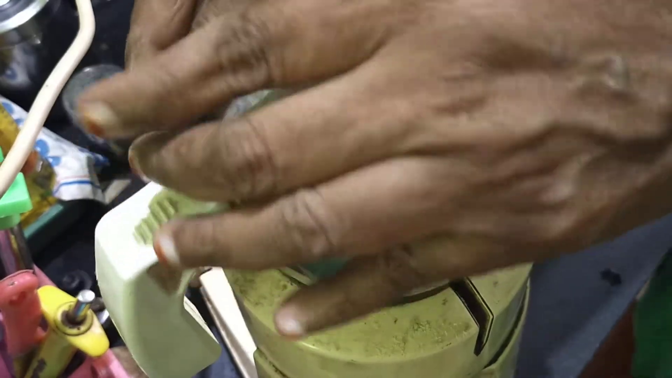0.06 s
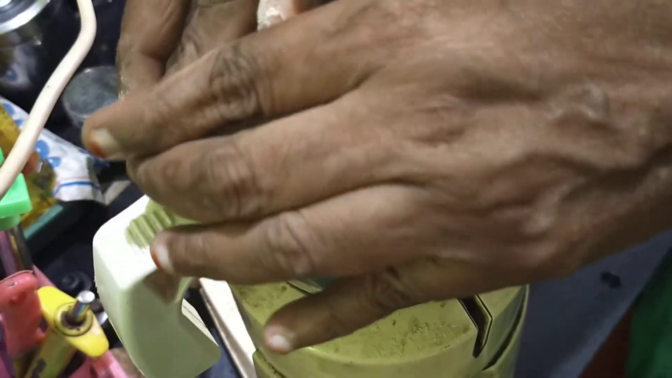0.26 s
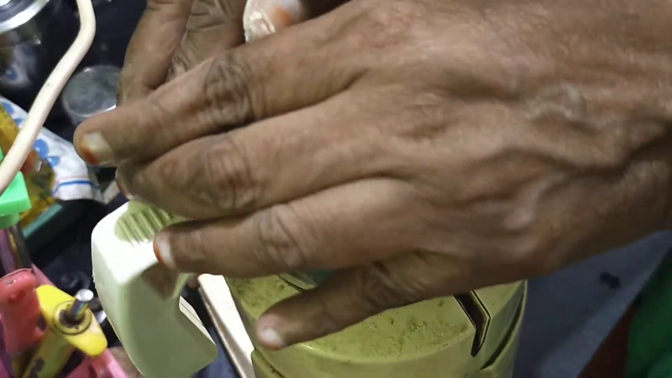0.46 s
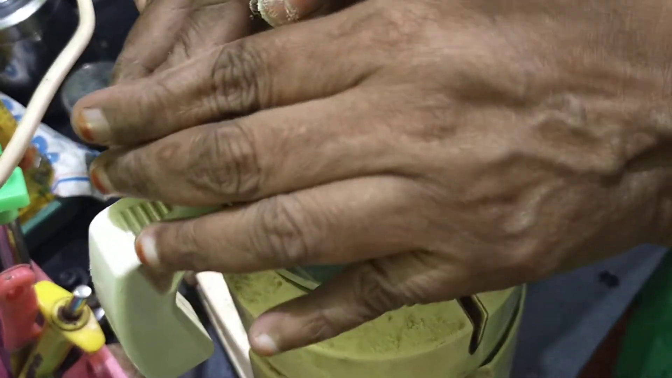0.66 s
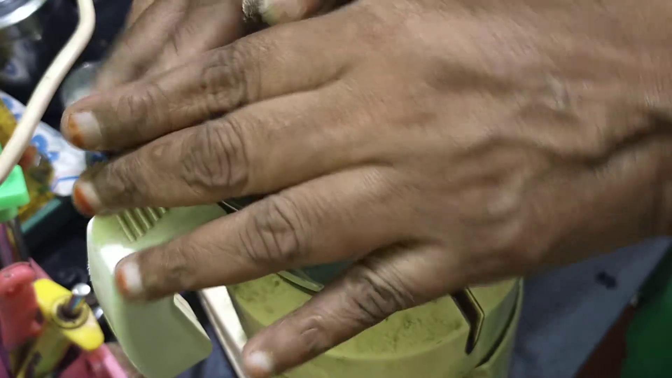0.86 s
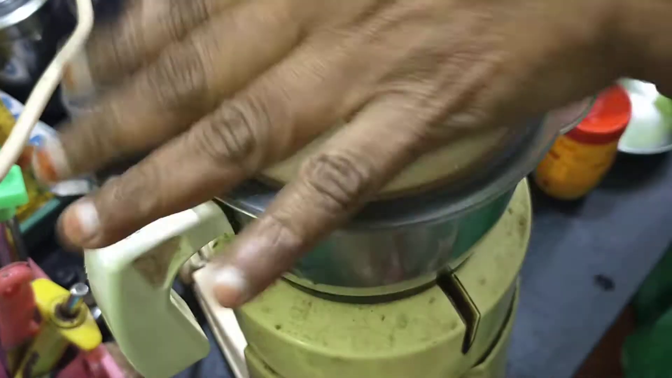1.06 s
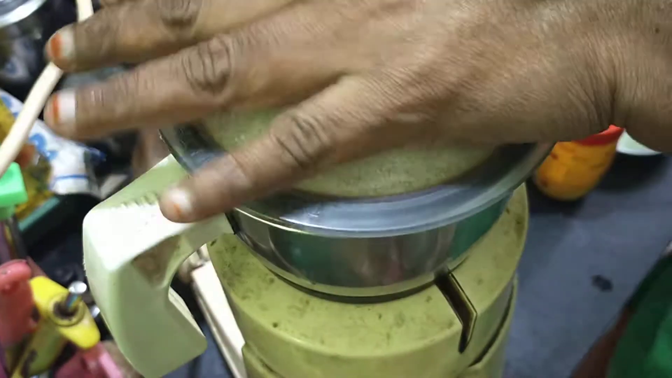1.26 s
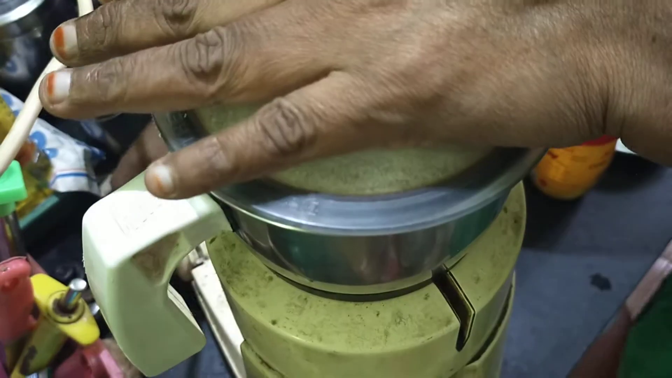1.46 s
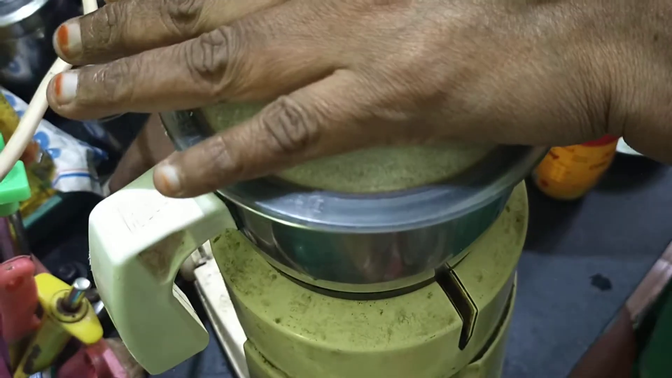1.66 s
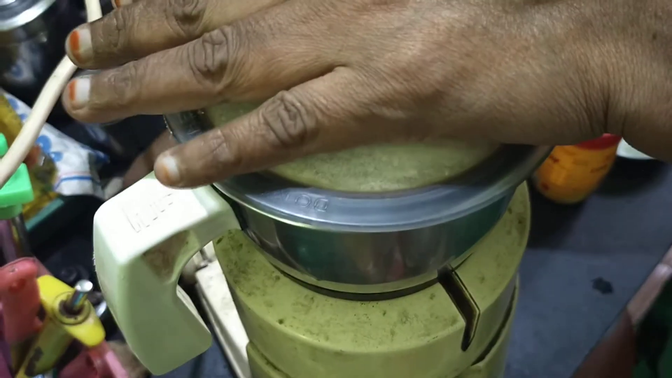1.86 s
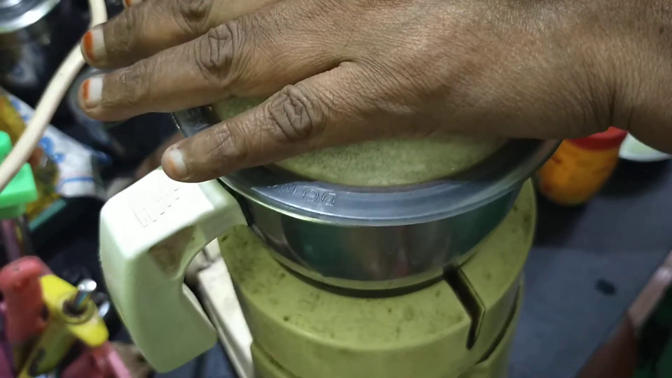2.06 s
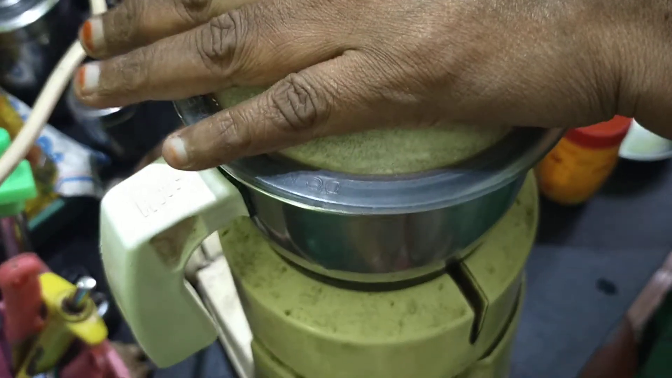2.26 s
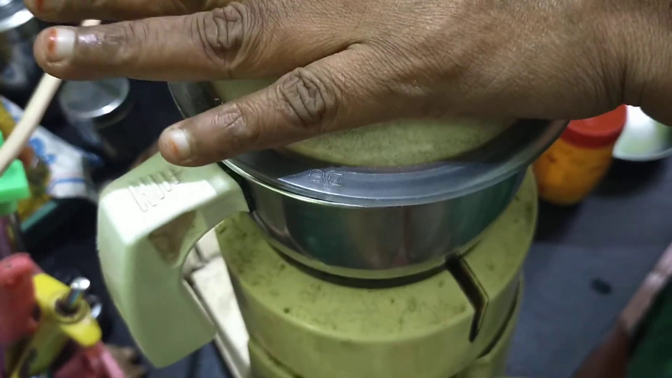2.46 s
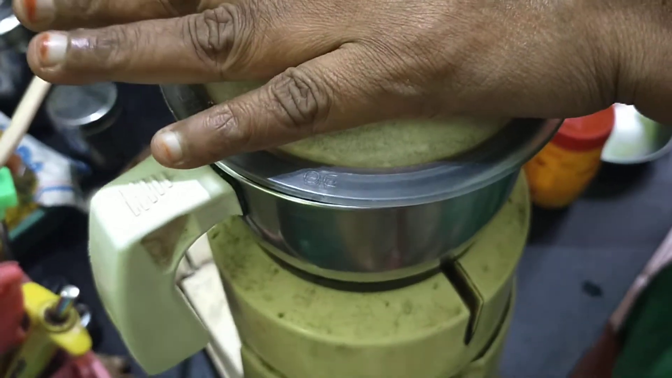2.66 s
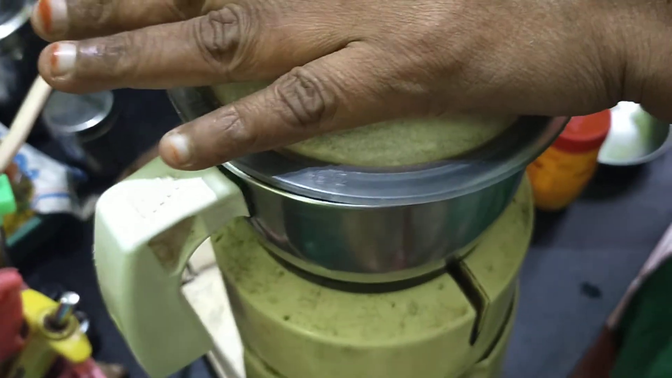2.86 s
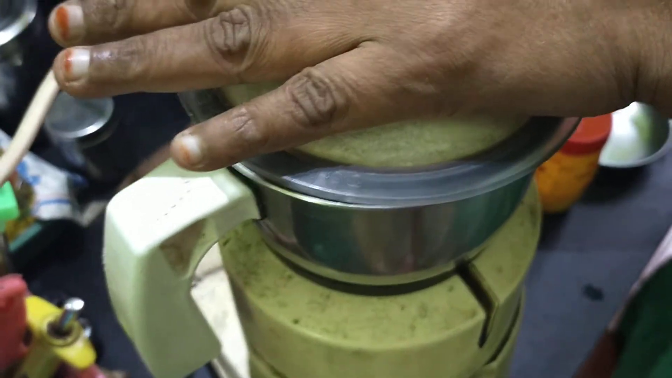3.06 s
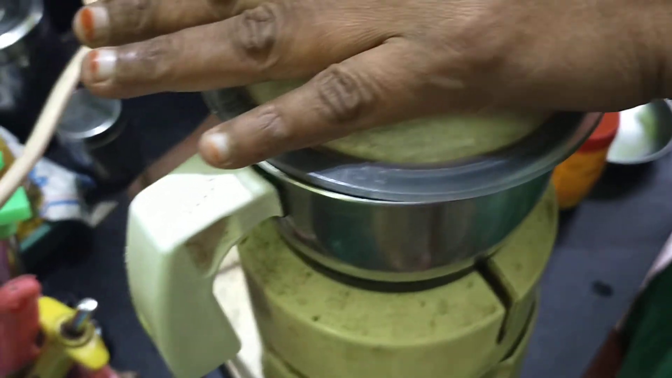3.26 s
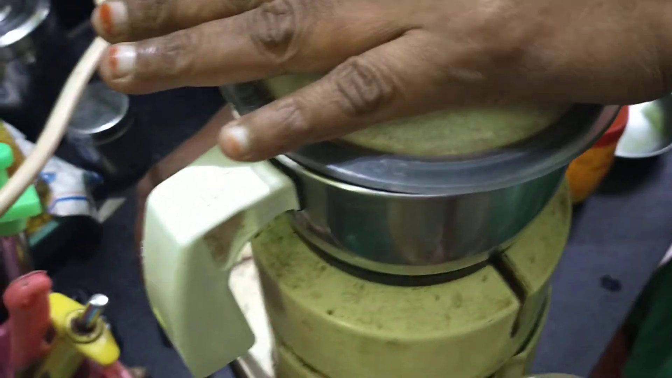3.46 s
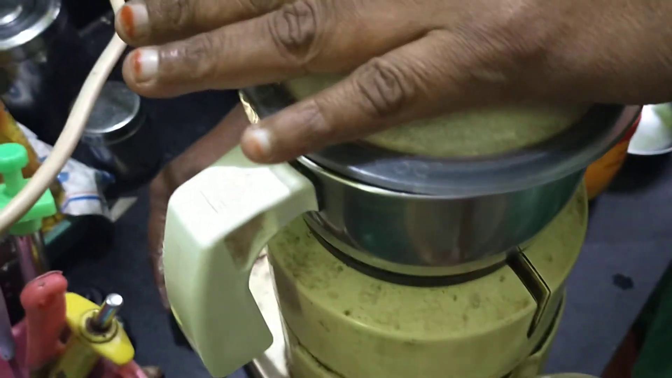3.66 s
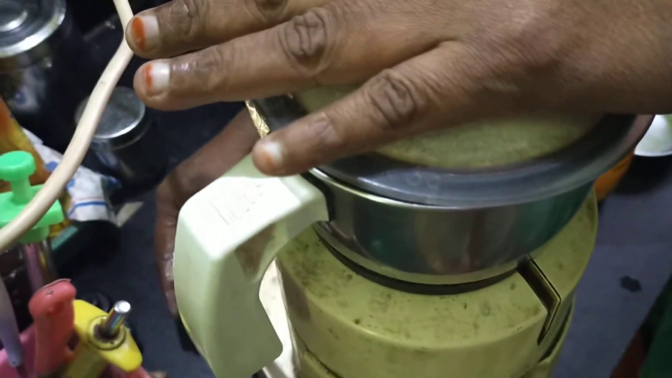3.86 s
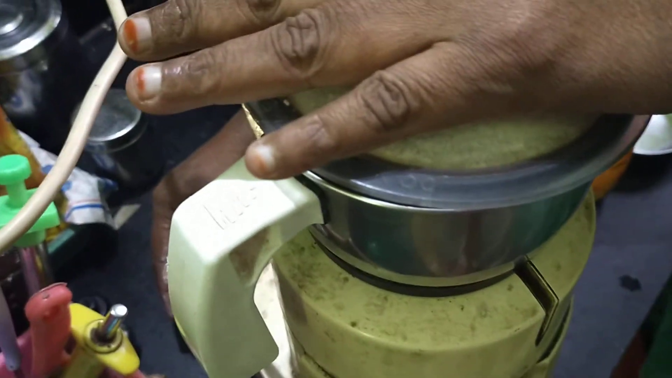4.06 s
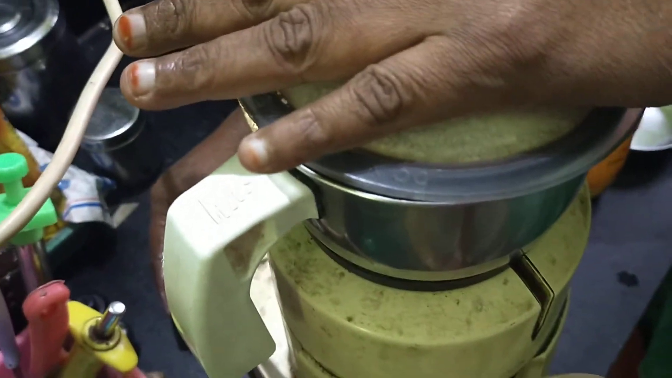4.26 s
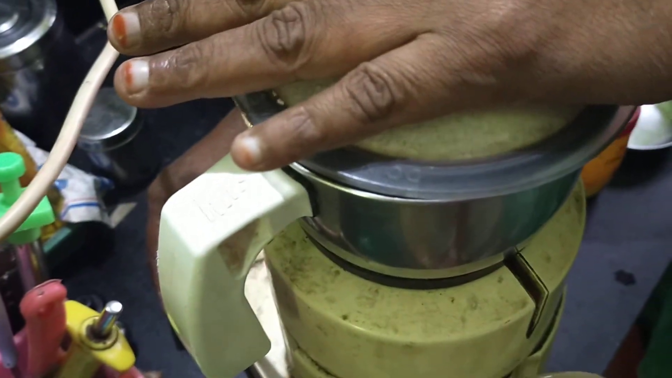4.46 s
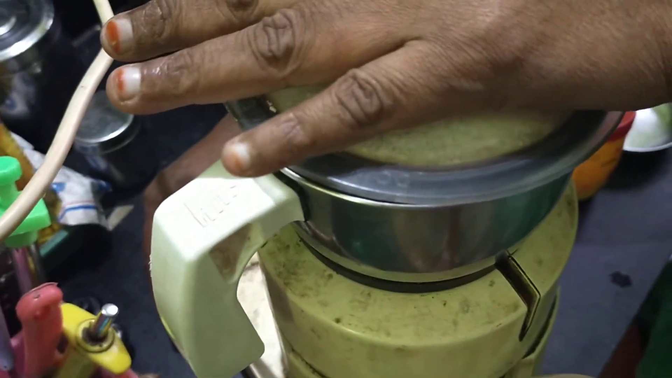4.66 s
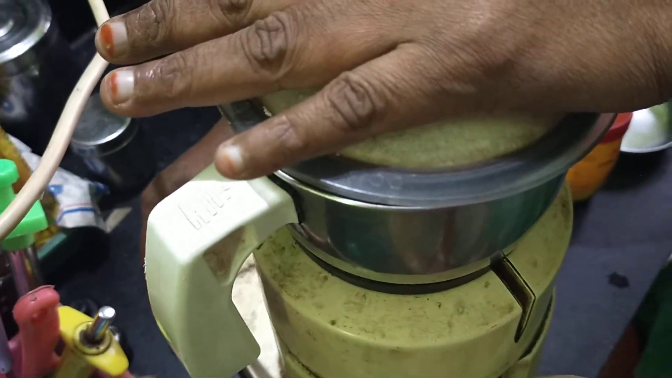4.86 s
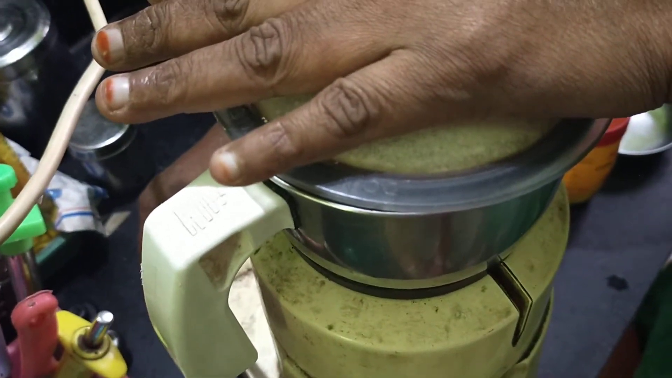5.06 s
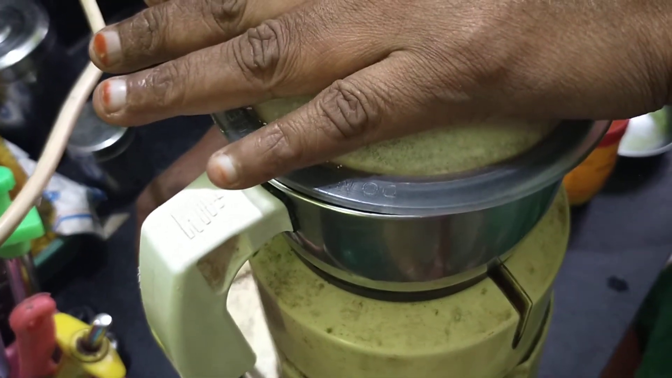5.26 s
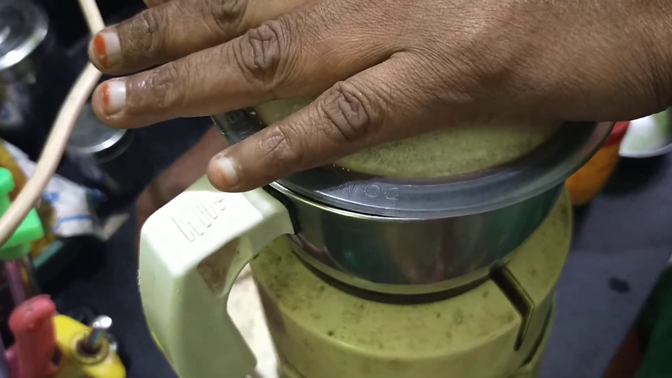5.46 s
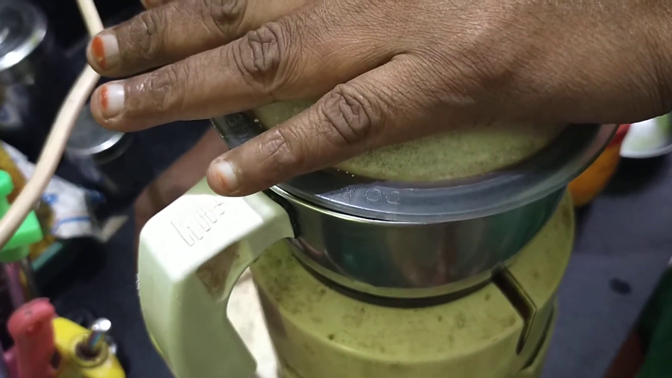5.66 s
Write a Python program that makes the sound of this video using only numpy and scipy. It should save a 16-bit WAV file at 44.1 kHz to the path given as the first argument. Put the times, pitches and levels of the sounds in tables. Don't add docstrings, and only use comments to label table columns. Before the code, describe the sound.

Light rubs and plastic clicks as a lid is pressed on, then a switch snaps and a grinder roars steadily with a high whine.

```python
import sys
import numpy as np
from scipy import signal
from scipy.io import wavfile
from scipy.ndimage import uniform_filter1d

SR = 44100
rng = np.random.default_rng(int(sys.argv[2]) if len(sys.argv) > 2 else 0)


def wav_record(signal):
    frames = np.transpose(np.atleast_2d(signal))
    bounded = np.clip(frames, -1, 1)
    quanta = np.round(bounded * 32767).astype(np.int16)
    wavfile.write(sys.argv[1], SR, quanta)


def voltage_ratio(decibels):
    exponent = np.asarray(decibels, float) / 20
    return 10 ** exponent


N = 252252
t = np.arange(N) / SR

# frequency_hz, level_db
ROOM_SPECTRUM = [(15, -39), (25, -7), (113, 3.5), (235, -5), (292, 1.5), (393, -7.5), (450, -3.5),
                 (693, -8), (1100, -7.5), (2040, -7), (2900, -6.5), (4980, -30), (8090, -19.5),
                 (9520, -26.5), (15900, -24.5)]
# peak_s, rise_s, fall_s, hiss_db, scrape_db
RUBS = [(.03, .09, .05, -64, -60), (.1, .04, .04, -55, -58), (.265, .13, .02, -66, -56),
        (.42, .17, .04, -62, -55), (.482, .022, .04, -44, -34), (.53, .025, .035, -47, -38),
        (.575, .045, .09, -59, -47), (.66, .06, .05, -57, -53), (.742, .056, .068, -50, -30),
        (.81, .05, .05, -61, -51), (1.0, .16, .085, -50, -50), (.885, .03, .04, -58, -53),
        (1.17, .07, .055, -52, -58), (1.3, .055, .14, -55, -65), (1.496, .045, .06, -58, -57),
        (1.623, .01, .035, -52, -45)]
# frequency_hz, level_db
HISS_SPECTRUM = [(2650, -52), (4500, -10), (5650, -12), (5950, -7), (7960, 3), (9580, -6), (10800, -4),
                 (14200, -3), (15900, -4.5)]
# frequency_hz, level_db
SCRAPE_SPECTRUM = [(300, -62), (900, -36), (1500, -29), (2100, -12.5), (2600, -4), (2950, -1), (3400, -7.5),
                   (4200, -18), (5000, -36), (7000, -59)]
# start_s, level_db, pitch_hz, treble_db, body_db
CLICKS = [(0.0772, -46, 2210, -55, -58), (0.1246, -36, 2860, -61, -55), (0.2623, -45, 3560, -52, -56),
          (0.3233, -42, 3070, -56, -49), (0.389, -38, 2870, -57, -52), (0.4356, -44, 2890, -52, -50),
          (0.4786, -24, 2150, -44, -43), (0.4834, -25, 2910, -40, -42), (0.5164, -29, 2980, -44, -48),
          (0.5236, -12, 2500, -41, -48), (0.5304, -30, 2580, -46, -45), (0.5373, -6.5, 2740, -31, -32),
          (0.8114, -36, 2890, -51, -58), (0.8724, -41, 2770, -48, -55), (0.8837, -31, 2820, -48, -51),
          (0.9226, -25, 2930, -35, -50), (0.9966, -39, 2800, -51, -52), (1.16, -51, 2780, -52, -51),
          (1.2166, -42, 2760, -62, -47), (1.6208, -42, 2990, -56, -41)]
# frequency_hz, level_db
LID_SPECTRUM = [(60, -40), (250, -4), (600, -5), (1500, -1), (2200, -2), (3500, -36)]
# start_s, level_db, pitch_hz, t60_s
THUDS = [(0.069, -51, 301, 0.06), (0.125, -35, 270, 0.054), (0.323, -25, 270, 0.05),
         (0.364, -42, 318, 0.06), (0.401, -31.5, 308, 0.06), (0.424, -37, 340, 0.07),
         (0.476, -28, 121, 0.087), (0.509, -32, 86.1, 0.06), (0.923, -37.5, 317, 0.066),
         (1.156, -37, 291, 0.094), (1.485, -46, 597, 0.068), (1.62, -41, 627, 0.06)]
# frequency_hz, level_db
SWITCH_SPECTRUM = [(900, -22), (2000, -11), (3000, -15), (5500, -30), (6800, -6), (8000, 0), (12000, -10),
                   (15000, -5)]
# start_s, level_db, pitch_hz, t60_s
LURCHES = [
    (1.738, -18.5, 385, .12),
    (1.742, -21, 453, 0.11),
    (1.84, -38, 88, .2),
]
# level_db, level_one_throb_below_db, level_one_throb_above_db
SHAFT_TONES = [(-33.5, -70, -48), (-31, -53, -76), (-44, -70, -62), (-44.5, -46.5, -45), (-39, -45, -51),
               (-43, -51, -40), (-45, -42, -56), (-37, -47, -44.5), (-47, -38.5, -39), (-43, -43, -40.5),
               (-49, -39, -44), (-29.5, -36, -30.5), (-34.5, -38, -29), (-34, -34.5, -35.5),
               (-47, -53, -30), (-35.5, -38, -38), (-44, -45, -47.5), (-42, -38, -72)]
HUM_LEVELS = [-24.5, -5, 3.5, -7, -13.5, -15.5, -13]
# frequency_hz, gain_db
BASE_RESONANCE = [(95, -15), (150, -12), (168, -22), (183, -1), (191, -8), (195.5, 3), (200, -5), (204, 0)]
# frequency_hz, gain_db
SECOND_MULTIPLE_GAIN = [(200, -28), (300, -16), (362, -2), (383, -9), (391, -2), (401, -14), (406, -3),
                        (414, -.5)]
# frequency_hz, gain_db
HOUSING_RESONANCE = [(1600, -16), (1850, -1), (2080, 6), (2250, -5), (2360, 3), (2430, -1.5), (2503, .6),
                     (2520, -5)]
# time_s, roar_db
LOAD = [(1.742, -23), (1.778, -25), (1.848, -15), (1.935, -23.5), (2.05, -20), (2.268, -22), (2.324, -19.5),
        (2.8, -19), (3.23, -20.5), (3.37, -19), (4.38, -19.5), (4.6, -17.5), (4.79, -20), (4.87, -17.5),
        (5.09, -20), (5.2, -18.5), (5.51, -22), (5.72, -18.5)]
# frequency_hz, level_db
ROAR_SPECTRUM = [(260, -36), (450, -27), (620, -24.5), (1000, -20.5), (1400, -17), (1900, -18), (2300, -10),
                 (2600, -8.5), (2850, -0.5), (3200, -6.5), (3750, -10.5), (4300, -23), (5400, -43.5),
                 (7200, -49)]
# frequency_hz, level_db
FIZZ_SPECTRUM = [(2820, -36), (4800, -10.5), (5350, -12.5), (6210, -6.5), (6720, -6.5), (8040, 3),
                 (8700, -5.5), (9330, -6.5), (10800, -15), (12700, -11), (14200, -4.5), (14900, 0),
                 (15700, -11)]
# frequency_hz, level_db
RATTLE_SPECTRUM = [(30, -31), (150, -28), (240, -13), (350, -4.5), (450, -3.5), (560, -16), (1300, -15.5),
                   (2100, -12.5), (2600, -47)]
# start_s, level_db, low_ring_db
CRACKS = [(1.8498, -15, -1), (1.8774, -17, -2), (1.9147, -14.5, -4), (2.0118, -19, -2), (2.1021, -14, 11.5),
          (2.161, -14, 5), (2.3425, -13, 0), (2.4015, -16, -2), (2.422, -15, -1), (2.7536, -20, 6),
          (3.1256, -17, 0), (4.2538, -21, 3), (4.373, -18, 6), (4.5835, -21, 4), (4.7322, -17, -2),
          (4.8604, -15, 6), (4.9043, -19, 3), (5.6291, -19, 1)]
# start_s, thump_db, tick_db, deepest_duck_db
KNOCKS = [
    (2.6572, -38, -19, -22),
    (4.8845, -50, -21, -12),
]

THROB_HZ = 99.77
SWITCH_S = 1.7183
FULL_SPEED_HZ = 208.8
USUAL_ROAR_DB = -19
SLOT_MULTIPLE = 12
MOTOR_STEP = 4


def evened(x):
    return x / np.sqrt(np.mean(x ** 2) + 1e-20)


def coloured(x, spectrum):
    f, db = np.transpose(spectrum)
    hz = abs(np.fft.fftfreq(4096, 1 / SR))
    gain_db = np.interp(np.log(hz + 1), np.log(f + 1), db)
    log_gain = np.log(voltage_ratio(np.maximum(gain_db, -90)))
    taps = np.fft.ifft(np.exp(np.conj(signal.hilbert(log_gain)))).real
    return evened(signal.oaconvolve(x, taps[:2048])[:N])


def drift(hz):
    return evened(signal.lfilter(*signal.butter(2, hz, fs=SR), rng.standard_normal(N)))


def grains(per_s, spread_db):
    size_db = spread_db * np.minimum(rng.exponential(1, N), 4)
    size = voltage_ratio(size_db) * rng.choice([-1., 1.], N)
    return evened(size * (rng.random(N) < per_s / SR))


def add(mix, s, sound):
    part = mix[round(s * SR):][:len(sound)]
    part += sound[:len(part)]


def ring(hz, db, t60, rise=0.00035):
    u = t[:SR // 4]
    return voltage_ratio(db - 60 * u / t60) * (1 - np.exp(-u / rise)) * np.sin(2 * np.pi * hz * u)


def fading(events):
    out = np.zeros(N)
    for s, db, t60 in events:
        add(out, s, voltage_ratio(db - 60 * t[:SR // 2] / t60))
    return out


def puffs(events, spectrum):
    return fading(events) * coloured(rng.standard_normal(N), spectrum)


def echoed(x, wet_db, t60):
    n = SR // 5
    taps = rng.standard_normal(n) * (rng.random(n) < .3) * voltage_ratio(-60 * t[:n] / t60)
    taps *= voltage_ratio(wet_db) / np.linalg.norm(taps)
    taps[0] = 1
    return signal.oaconvolve(x, taps / np.linalg.norm(taps))[:N]


def kitchen():
    return voltage_ratio(-53.5 + drift(6)) * coloured(rng.standard_normal(N), ROOM_SPECTRUM)


def strokes(column):
    edge_db = -22
    out = np.zeros(N)
    for row in RUBS:
        peak_s, rise_s, fall_s = row[:3]
        u = t[:2 * SR] - peak_s
        add(out, 0, voltage_ratio(row[column] + edge_db * np.maximum(-u / rise_s, u / fall_s) ** 2))
    return out


def rubs():
    hiss = strokes(column=3) * coloured(rng.standard_normal(N), HISS_SPECTRUM)
    rough = rng.standard_normal(N) + 0.46 * grains(1200, spread_db=4)
    scrape = strokes(column=4) * voltage_ratio(2.6 * drift(120)) * coloured(rough, SCRAPE_SPECTRUM)
    return hiss + scrape


def lid_hits():
    clicks = [(*row, .0028 - .00024 * row[1]) for row in CLICKS]
    hits = puffs([(s, treble_db + 0.5, 2 * t60) for s, _, _, treble_db, _, t60 in clicks], HISS_SPECTRUM)
    hits += puffs([(s, body_db + 3.5, 3.6 * t60) for s, _, _, _, body_db, t60 in clicks], LID_SPECTRUM)
    for s, db, hz, _, _, t60 in clicks:
        add(hits, s, ring(hz, db + 6, t60, rise=0.0004))
    for s, db, hz, t60 in THUDS:
        add(hits, s, ring(hz, db + 1, t60, rise=0.0026))
        add(hits, s, ring(1.7 * hz, db - 10, .6 * t60, rise=.0025))
    return hits


def switch():
    t60 = .034
    treble = puffs([(SWITCH_S, -16.5, t60)], SWITCH_SPECTRUM)
    return treble + puffs([(SWITCH_S, -23, 2 * t60)], ROAR_SPECTRUM)


def hands():
    return rubs() + echoed(lid_hits() + switch(), wet_db=-9, t60=.16)


def shaft():
    since = np.maximum(t - SWITCH_S, 0)
    lag = 160 * np.exp(-since / .2) + 14 * np.exp(-since / .65)
    eased = 1.1 * np.clip((t - 4.42) / .06, 0, 1)
    return FULL_SPEED_HZ - lag + eased, lag / FULL_SPEED_HZ


def shaft_tones(speed, slip, dig_db, waver):
    throb = 2 * np.pi * THROB_HZ * t[::MOTOR_STEP]
    turns = 2 * np.pi * np.cumsum(speed)[::MOTOR_STEP] / SR
    wobble = .025 * drift(29)[::MOTOR_STEP]
    speed, slip = speed[::MOTOR_STEP], slip[::MOTOR_STEP]
    low_db = [np.interp(speed, *np.transpose(BASE_RESONANCE)),
              np.interp(2 * speed, *np.transpose(SECOND_MULTIPLE_GAIN))]
    high_db = -23 * np.sqrt(slip) + 1.03 * dig_db
    out = np.zeros(len(throb))
    for k, levels in enumerate(SHAFT_TONES, 1):
        depth = .8 if k == SLOT_MULTIPLE else min(.3 + k / 5, 1)
        for level_db, side in zip(levels, (0, -1, 1)):
            swell_db = low_db[k - 1] if k <= 2 else high_db
            if k == SLOT_MULTIPLE:
                whine_hz = k * speed + side * THROB_HZ
                swell_db = np.interp(whine_hz, *np.transpose(HOUSING_RESONANCE)) - 60 * slip * (side > 0)
            phase = k * (turns + wobble) + side * throb + 2 * np.pi * rng.random()
            out += voltage_ratio(level_db + 3 + swell_db + depth * waver[rng.integers(6)]) * np.cos(phase)
    return out


def mains_hum(slip, dig_db, waver):
    throb = 2 * np.pi * THROB_HZ * t[::MOTOR_STEP]
    slip = slip[::MOTOR_STEP]
    hum_db = -44.5 + 8 * np.minimum(slip / .03, 1) ** 2 + .75 * dig_db
    buzz_db = -43 + .6 * 20 * np.log10(np.minimum(slip / .45, 1))
    buzz_db += .9 * np.minimum(dig_db + 1.5, 0)
    out = np.zeros(len(throb))
    for k in range(1, 26):
        if k <= len(HUM_LEVELS):
            level_db = HUM_LEVELS[k - 1] + hum_db + 0.16 * waver[rng.integers(6)]
        else:
            level_db = buzz_db + 2 * waver[rng.integers(6)]
        out += voltage_ratio(level_db) * np.cos(k * throb + 2 * np.pi * rng.random())
    return out


def motor(speed, slip, roar_db):
    dig_db = roar_db[::MOTOR_STEP] - USUAL_ROAR_DB
    waver = [2.46 * drift(9.3)[::MOTOR_STEP] for _ in range(6)]
    tones = shaft_tones(speed, slip, dig_db, waver) + mains_hum(slip, dig_db, waver)
    return signal.resample_poly(tones, MOTOR_STEP, 1)[:N]


def grain_strikes(speed, slip, roar_db):
    turn = np.cos(2 * np.pi * np.cumsum(speed) / SR)
    throb = np.cos(2 * np.pi * THROB_HZ * t)
    whole = np.clip(.22 + .7 * slip, 0, .6)
    strikes = whole * grains(1500, spread_db=1) + (1 - whole) * rng.standard_normal(N)
    strikes /= np.sqrt(whole ** 2 + (1 - whole) ** 2)
    surge_db = 1.13 * drift(37) + 0.65 * drift(110)
    roar = coloured(strikes * (1 + 0.23 * turn) * (1 + 0.18 * throb), ROAR_SPECTRUM)
    fizz = coloured(strikes * (1 + 0.16 * turn) * (1 + 0.089 * throb), FIZZ_SPECTRUM)
    fizz_db = roar_db - 10.3 - 6.5 * np.sqrt(slip)
    return voltage_ratio(roar_db - 2.5 + surge_db) * roar + voltage_ratio(fizz_db + 0.67 * surge_db) * fizz


def rattle(slip, roar_db):
    level_db = -41 + 21 * np.sqrt(slip) + .9 * (roar_db - USUAL_ROAR_DB)
    return voltage_ratio(level_db + 1.6 * drift(16)) * coloured(rng.standard_normal(N), RATTLE_SPECTRUM)


def cracks():
    out = puffs([(s, db - 6.5, .018) for s, db, _ in CRACKS], FIZZ_SPECTRUM)
    return out + puffs([(s, db + low_db - 12.5, .016) for s, db, low_db in CRACKS], ROAR_SPECTRUM)


def housing_lurch():
    out = np.zeros(N)
    for s, db, hz, t60 in LURCHES:
        add(out, s, ring(hz, db, t60, rise=.008))
    return out


def jar(speed, slip, roar_db):
    sound = grain_strikes(speed, slip, roar_db) + rattle(slip, roar_db)
    return echoed(sound + cracks() + housing_lurch(), wet_db=-12, t60=.07)


def scene():
    speed, slip = shaft()
    roar_db = np.interp(t, *np.transpose(LOAD))
    running = np.clip((t - SWITCH_S) / .037, 0, 1)
    grinder = running * (motor(speed, slip, roar_db) + jar(speed, slip, roar_db))
    return (kitchen() + hands() + grinder)[None]


def top_cut(x):
    return signal.sosfilt(signal.butter(12, 16470, fs=SR, output="sos"), x)


def record(dry):
    duck_db = np.zeros(N)
    for s, _, _, deepest_db in KNOCKS:
        times = s + np.array([-.01, -.008, 0, .002, .03, .098, .1])
        duck_db += deepest_db * np.interp(t, times, [0, .41, .41, 1, .6, .33, 0])
    push = uniform_filter1d(fading([(s - .003, db + 2.5, .15) for s, db, *_ in KNOCKS]), 200)
    push -= uniform_filter1d(fading([(s + .078, db - 1, 1.2) for s, db, *_ in KNOCKS]), 3000)
    ticks = puffs([(s - .001, db, .006) for s, _, db, _ in KNOCKS], HISS_SPECTRUM)
    ducked = dry * voltage_ratio(duck_db) - push + ticks
    ceiling = .8
    rounded = ceiling * np.tanh(ducked / ceiling)
    low_pass = signal.firwin(1601, 15745, window=("kaiser", 9), fs=SR)
    mix = signal.oaconvolve(rounded, low_pass[None], "same")
    return top_cut(mix)


dry = scene()
out = record(dry)
wav_record(out)
```